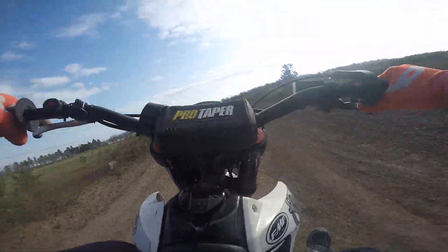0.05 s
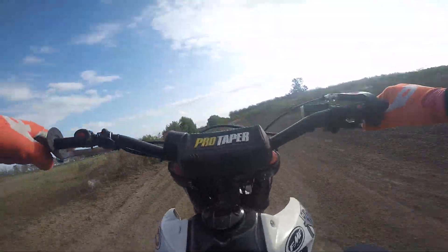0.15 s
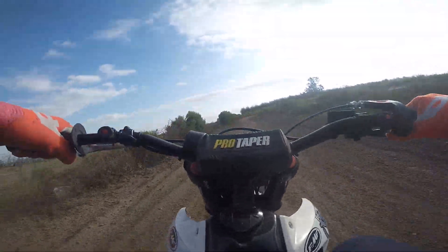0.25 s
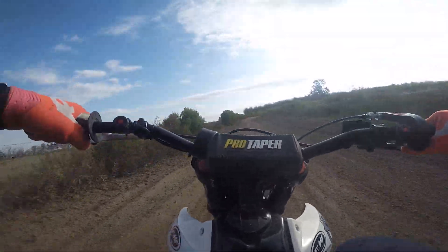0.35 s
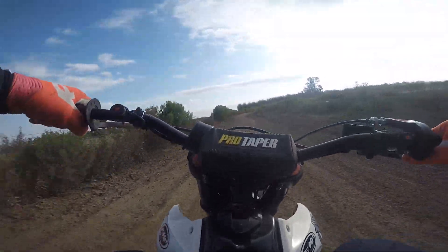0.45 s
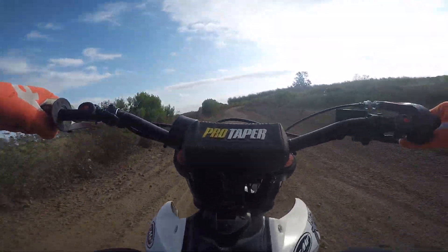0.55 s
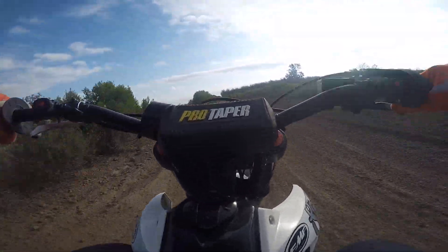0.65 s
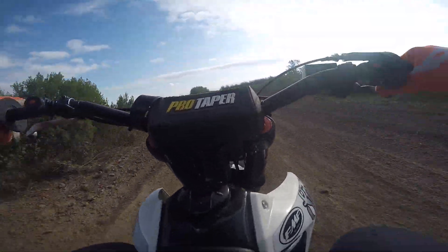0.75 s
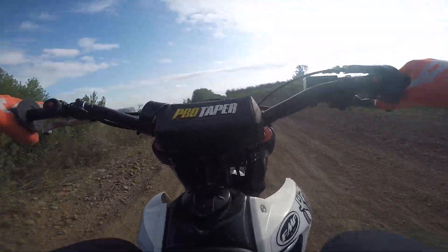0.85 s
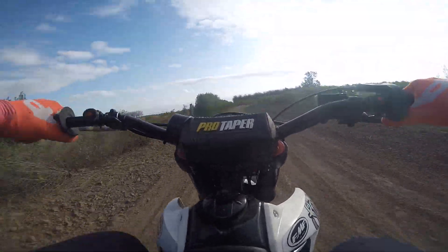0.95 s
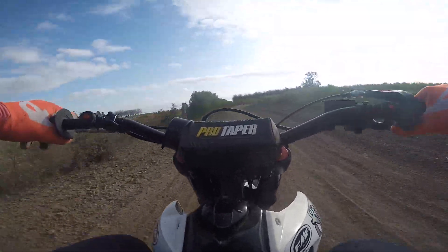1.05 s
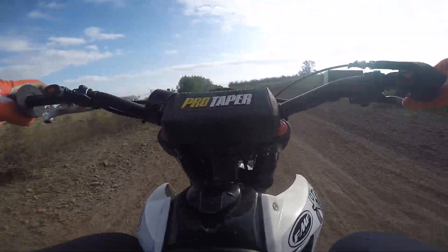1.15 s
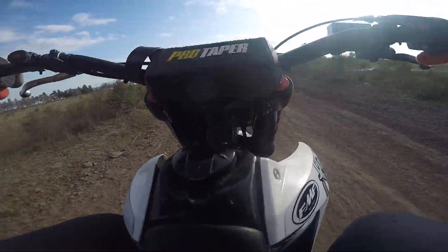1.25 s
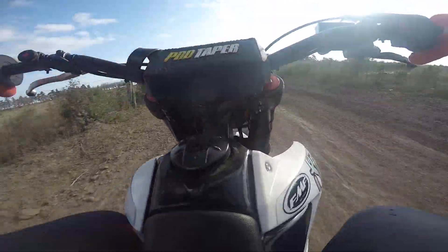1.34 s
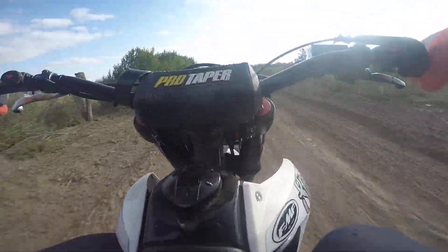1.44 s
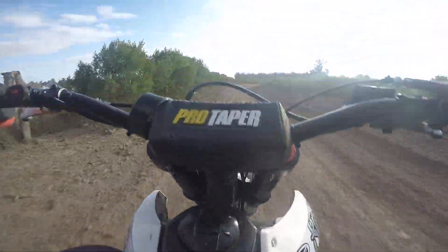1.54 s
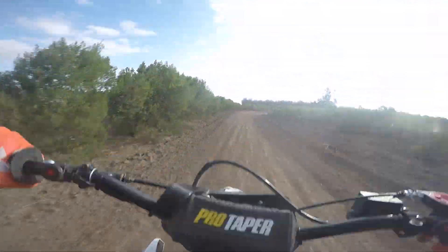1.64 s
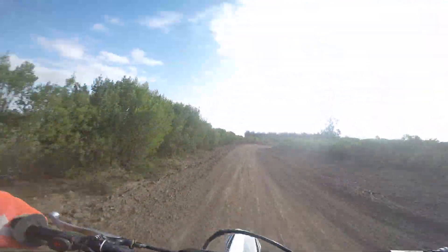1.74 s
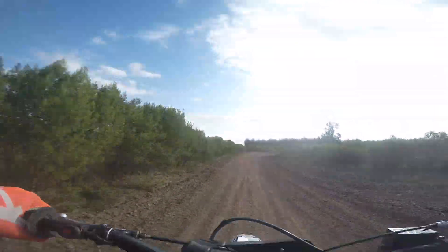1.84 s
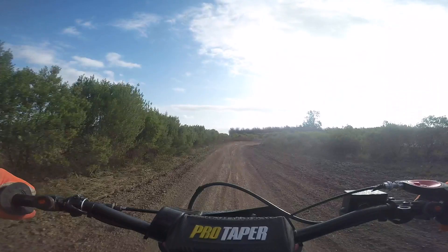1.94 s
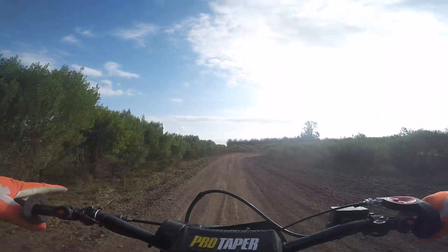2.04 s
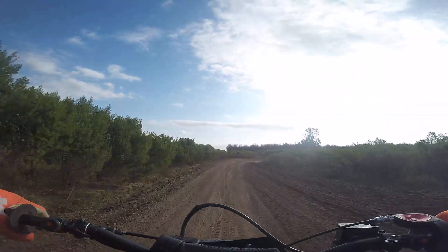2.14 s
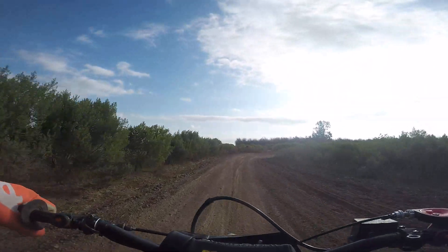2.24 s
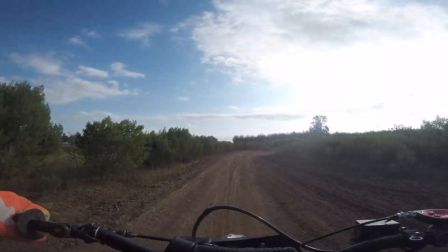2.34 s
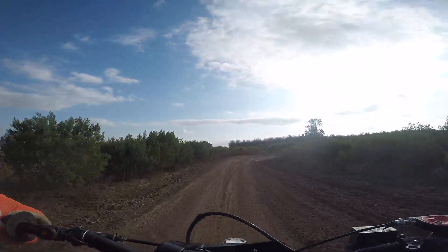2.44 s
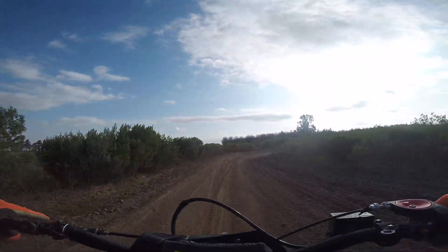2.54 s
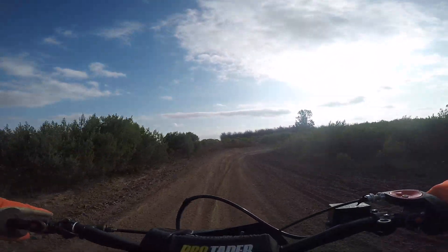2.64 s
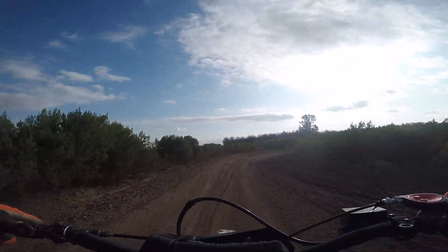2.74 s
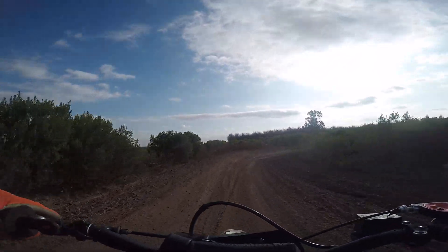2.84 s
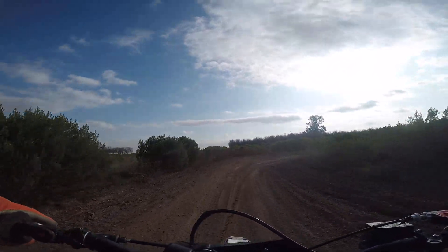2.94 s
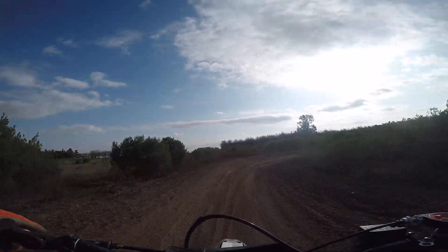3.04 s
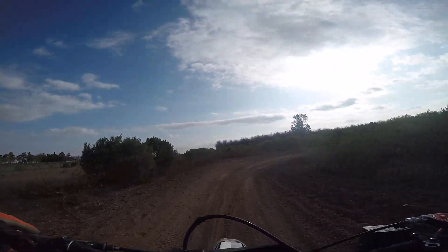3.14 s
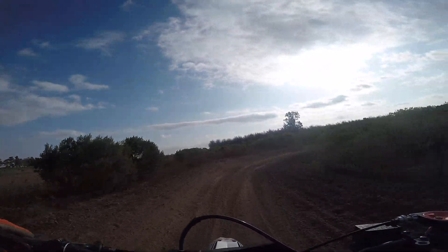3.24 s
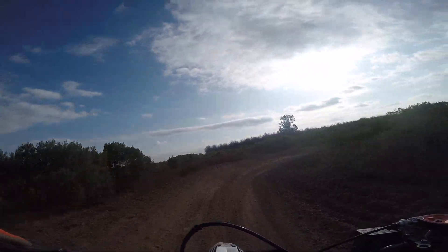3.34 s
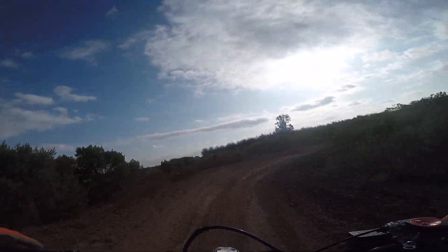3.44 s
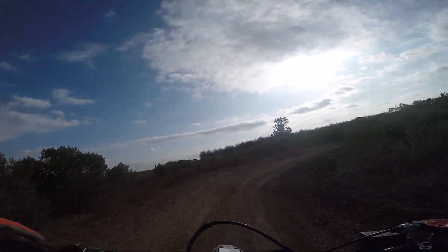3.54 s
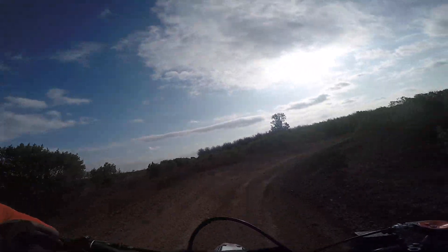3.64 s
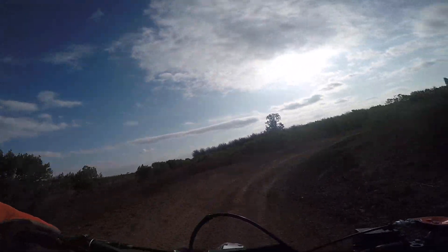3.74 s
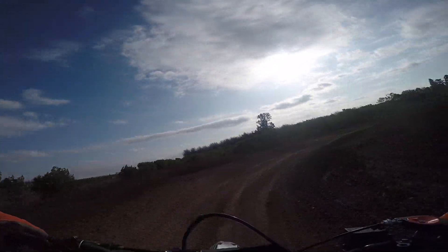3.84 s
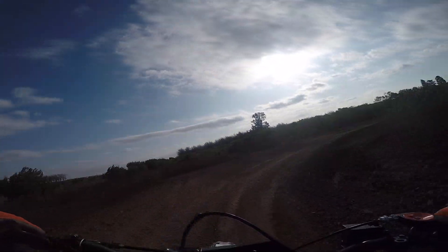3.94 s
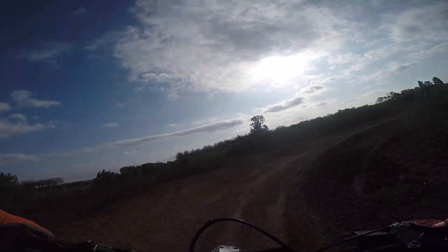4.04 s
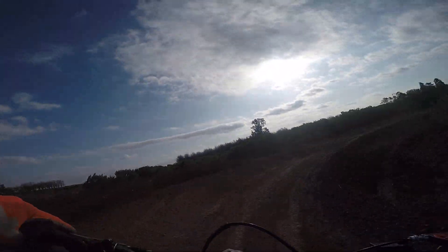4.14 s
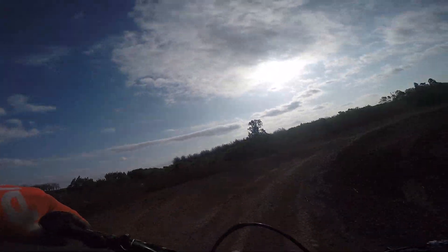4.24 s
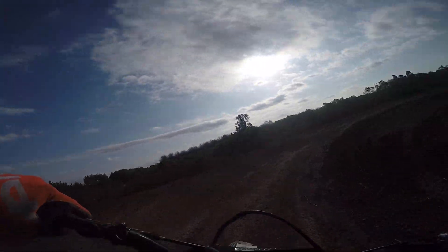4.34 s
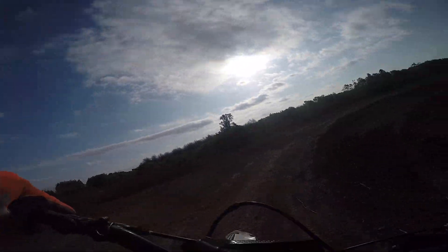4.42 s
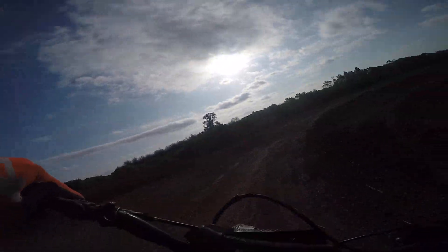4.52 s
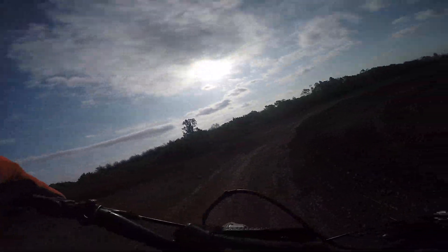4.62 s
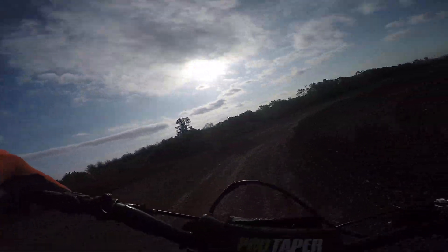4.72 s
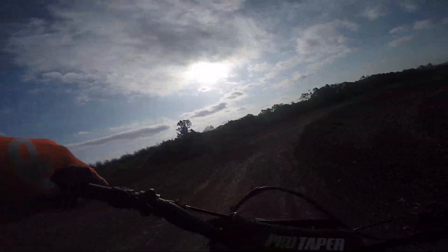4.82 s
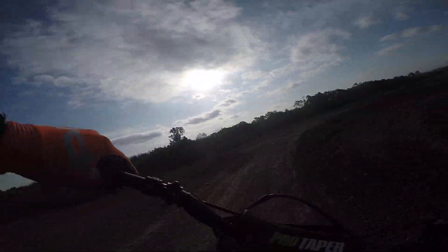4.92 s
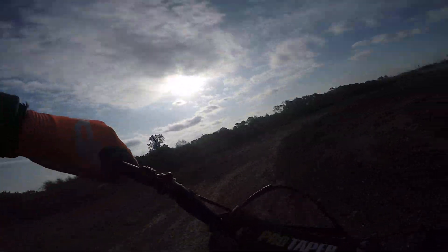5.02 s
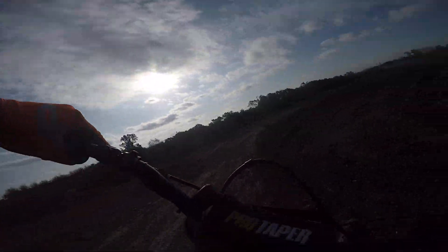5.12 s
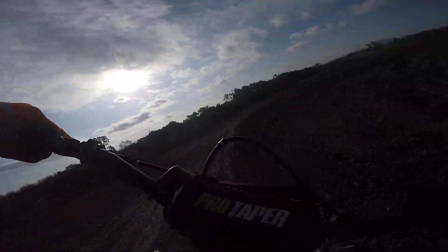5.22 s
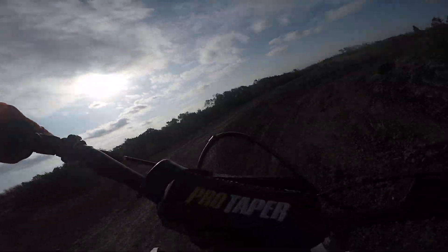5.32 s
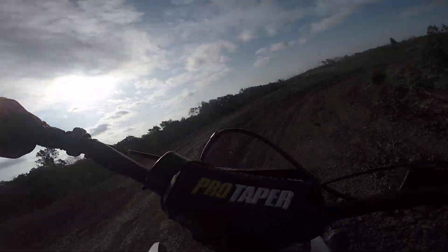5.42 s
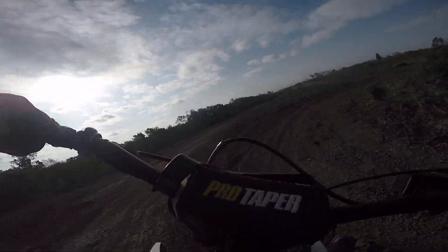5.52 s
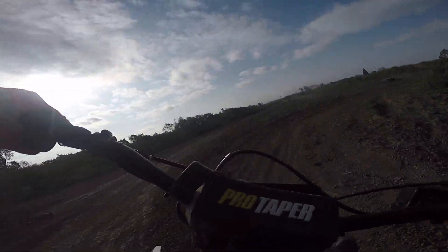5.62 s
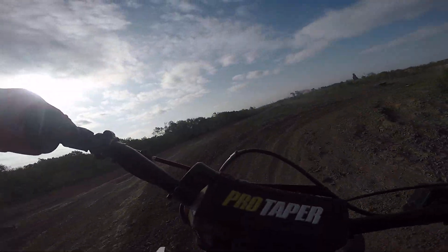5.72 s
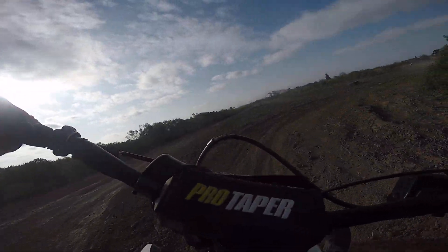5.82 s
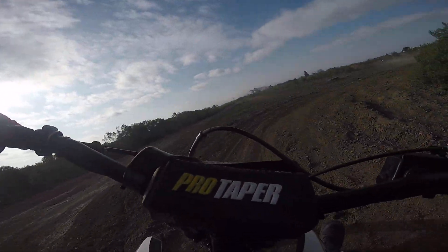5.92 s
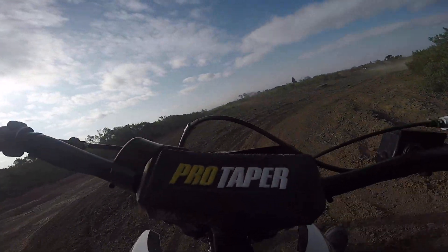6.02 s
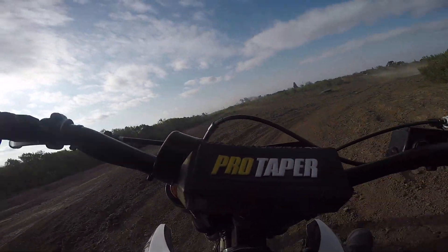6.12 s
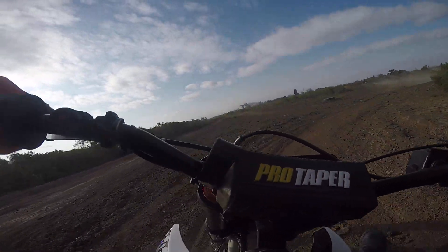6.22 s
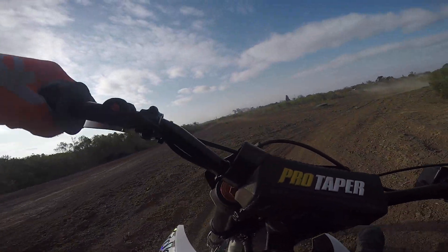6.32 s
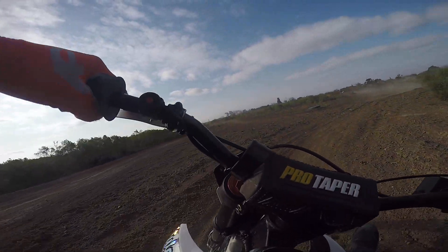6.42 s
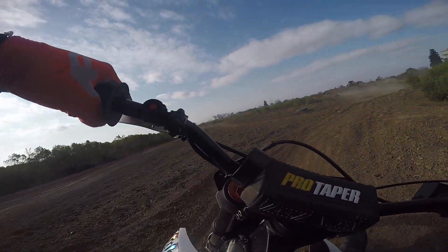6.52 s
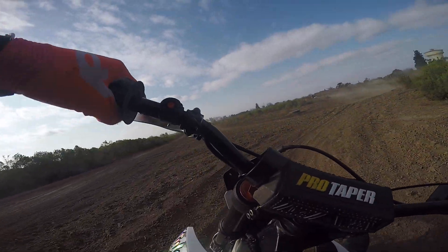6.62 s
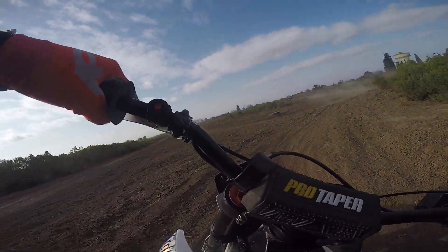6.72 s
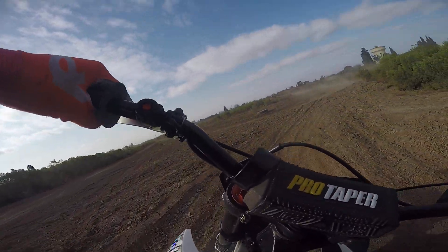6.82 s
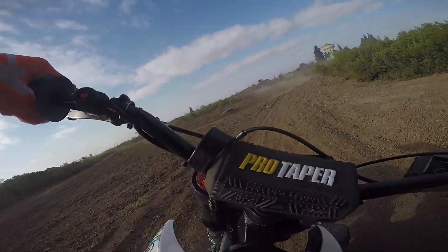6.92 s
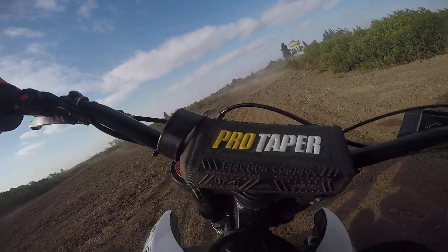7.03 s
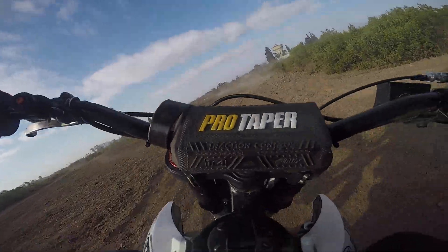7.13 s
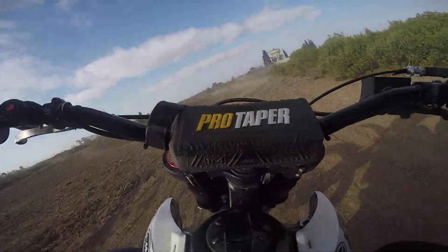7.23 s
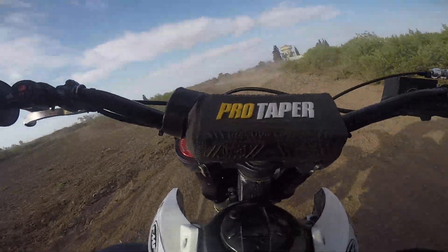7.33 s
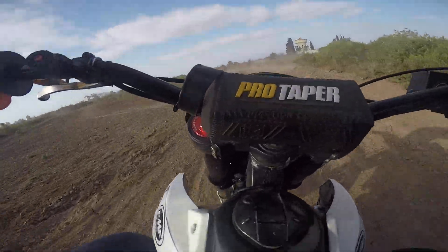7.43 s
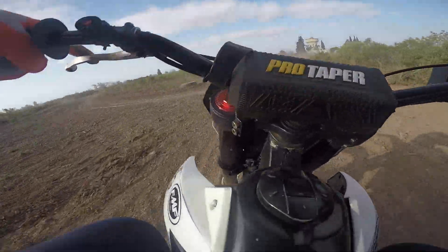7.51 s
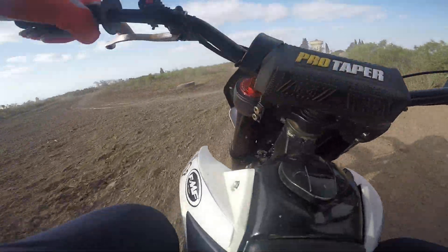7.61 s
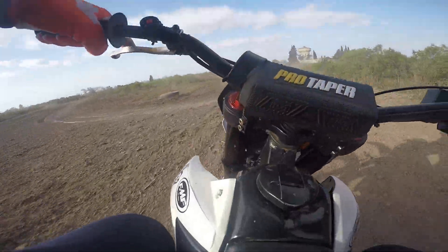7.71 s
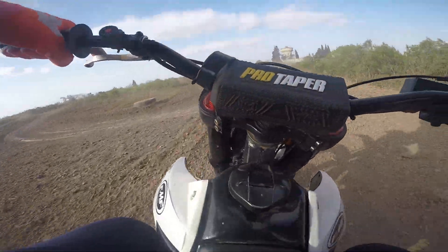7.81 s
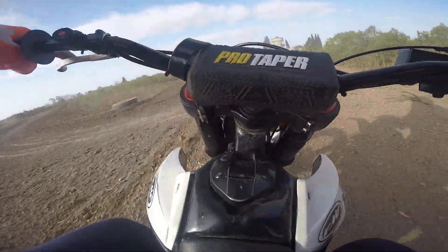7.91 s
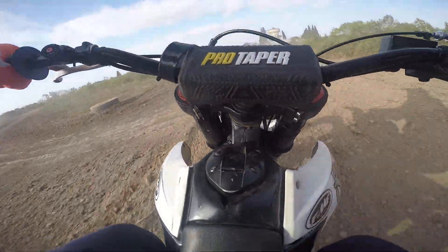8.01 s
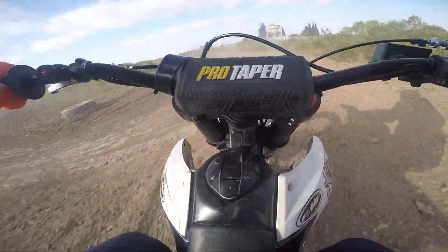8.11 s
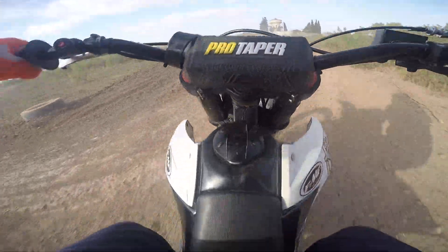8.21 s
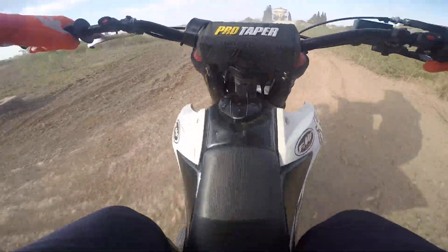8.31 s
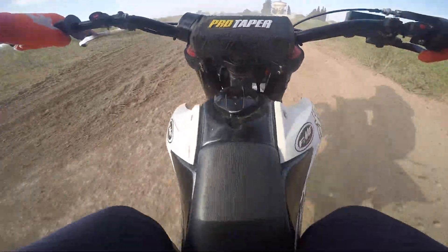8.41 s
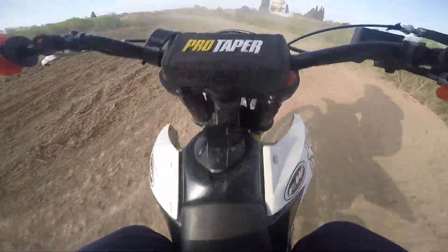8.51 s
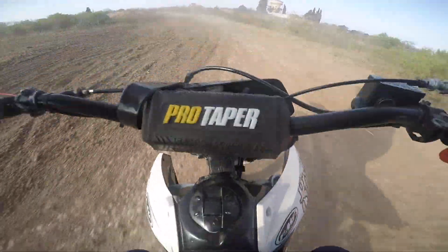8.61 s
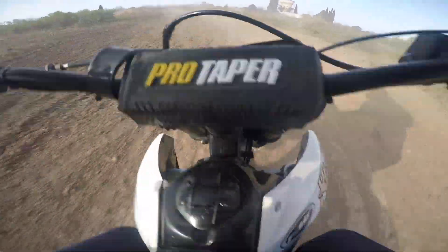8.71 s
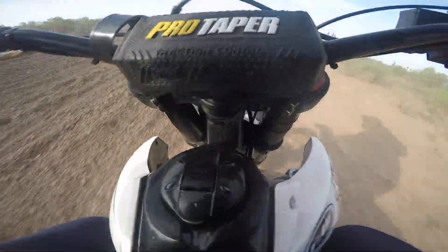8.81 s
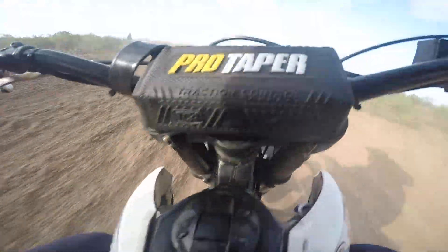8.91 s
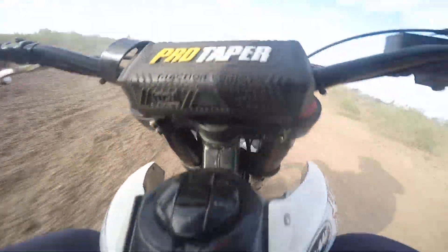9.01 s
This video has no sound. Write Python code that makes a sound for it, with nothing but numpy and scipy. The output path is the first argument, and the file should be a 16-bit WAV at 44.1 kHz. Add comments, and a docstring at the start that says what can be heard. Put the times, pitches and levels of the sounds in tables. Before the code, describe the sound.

A dirt bike engine revs hard, slows almost to a stall with chain knocks, then chugs and accelerates away in buffeting wind.

```python
"""On a dirt bike, heard from the rider's chest. The single-cylinder four-stroke engine pulls hard,
coasts into a bend, nearly stalls while the drive chain knocks, chugs round and speeds away.
Each firing booms in the exhaust pipe, the airbox blares as it sucks air, and the casings clatter.
Gears whine, a body panel hums, the brake squeaks once, and wind buffets the microphone."""
import sys
import numpy as np
from scipy import signal
from scipy.fft import rfft, irfft, next_fast_len
from scipy.io import wavfile
from scipy.ndimage import uniform_filter1d, map_coordinates

SR = 44100
rng = np.random.default_rng(int(sys.argv[2]) if len(sys.argv) > 2 else 0)


def int16_out(signal):
    """Quantize to a 16-bit WAV file."""
    q = np.round(np.clip(np.atleast_2d(signal).T, -1, 1) * 32767)
    wavfile.write(sys.argv[1], SR, q.astype(np.int16))


N = 399526

# Engine speed. Each row: time in seconds, firings per second.
ENGINE_SPEED = [(0, 76), (.15, 74.3), (.43, 81.4), (.66, 86), (.96, 83.8), (1.11, 96.6), (1.26, 77.7),
                (1.51, 67.5), (1.68, 55.8), (2.15, 55), (2.48, 47.5), (2.85, 45.3), (3.35, 38.5),
                (3.7, 29.8), (4.15, 14.6), (4.43, 16), (4.62, 26.8), (5.12, 25.7), (5.35, 30.6),
                (5.47, 28.7), (5.72, 26.8), (6, 31), (6.5, 35.8), (6.74, 41.7), (7.03, 52.6), (7.33, 52),
                (7.48, 55.8), (8.08, 67.8), (8.3, 71), (8.58, 93.4), (8.79, 71), (9.06, 81)]
# The rider's hand. Each row: time in seconds, throttle from 0 (shut) to 1 (open).
THROTTLE_TWIST = [(0, 0.63), (.2, 0.63), (.45, 0.59), (1.08, 0.55), (1.42, .48), (1.5, 0.23), (1.78, 0.01),
                  (2, .1), (3.05, 0.06), (3.22, 0.03), (4.2, 0.03), (5.05, 0.02), (5.35, 0.07), (6.05, .16),
                  (6.6, 0.17), (7.03, 0.67), (8.1, .9), (8.59, 0.92), (8.67, 0.2), (8.95, .8)]
# How ragged the firing is. Each row: time in seconds, roughness (0 is even, capped at 1).
FIRING_ROUGHNESS = [(0, 0), (1.45, 0.17), (1.7, 1.06), (4.3, 1.1), (4.75, 0.11), (7.05, .24), (8.1, 0.11),
                    (9.06, .16)]
# Spells of running. Each lists: start, end, fade-in and fade-out, all in seconds.
NEAR_STALL = (4.35, 5.22, .25, 0.17)
PULLING_AWAY = (6.55, 8.39, 0.22, 0.75)
COASTING = (2.2, 3.7, 0.58, .25)  # the rear wheel drives the engine

# The tone of each sound. Each row: frequency in Hz, relative level in dB.
FIRM_THUMP_TONE = [(20, -10.5), (45, -15.5), (70, 8), (100, 4.5), (135, -1.5), (165, -3.5), (200, -34.5),
                   (500, -69)]
SOFT_THUMP_TONE = [(20, -5), (45, -1), (80, 9.5), (110, -4.5), (135, -11), (175, -40), (400, -67)]
SHUT_BARK_TONE = [(90, -65.5), (195, -3.5), (235, 2.5), (285, 1), (325, -0.5), (360, -5), (410, -12),
                  (460, -16.5), (700, -18), (1200, -90)]
HALF_BARK_TONE = [(90, -34.5), (160, -6.5), (200, -7), (230, 0.5), (265, 6.5), (310, 2.5), (345, -6.5),
                  (385, -5.5), (420, -21), (600, -82), (1200, -35)]
FULL_BARK_TONE = [(90, -86), (150, -2.5), (185, 6.5), (210, 9.5), (260, 0.5), (305, -1.5), (355, 6.5),
                  (385, 3), (415, -8), (470, -13), (600, -103), (1200, -105)]
PULLING_BARK_TONE = [(150, -39.5), (210, -9), (255, 2), (305, 3.5), (355, 8), (400, -18), (460, -21),
                     (1000, -62)]
RASP_TONE = [(120, -20.5), (400, -0.5), (505, 7.5), (570, -4), (630, 4.5), (710, -4), (820, -1.5),
             (1000, -8.5), (1300, -20), (1900, -34), (4000, -45)]
BLARE_TONE = [(600, -52), (1050, -16.5), (1280, -6), (1500, -5.5), (1700, -1.5), (1880, 2), (2200, -5.5),
              (2650, -4), (2950, -10), (3200, -19.5), (3700, -2.5), (4400, -19), (5500, -24), (9000, -37.5)]
CLATTER_TONE = [(300, -3.5), (950, -14), (1600, -7.5), (2440, -2.5), (2600, 4), (2920, 0), (3270, -14),
                (3700, -1), (4500, -0.5), (4680, -6.5), (4880, -9), (5550, -11.5), (6200, -21.5),
                (7300, -68.5)]
FIZZ_TONE = [(3000, -51), (6500, 0.5), (7200, 5.5), (8000, 1.5), (8800, -6.5), (10000, -10.5), (11300, -8),
             (12800, -13.5), (14200, -9), (15500, -18)]
WIND_TONE = [(10, -8), (25, 1), (45, 2.5), (80, -9), (140, -18.5), (300, -27), (1000, -53)]
HONK_TONE = [(1100, -45.5), (1420, -3), (1520, -13), (1640, -14.5), (2000, -24)]
CLACK_TONE = [(150, -10), (420, -20), (900, -15), (1600, -0.5), (2600, 3.5), (3250, -4), (4000, -2.0),
              (5000, -1.0), (6200, -18), (7600, -11), (9500, -29.5), (15500, -30)]
# The notes the casings ring at. Each row: pitch in Hz, width in Hz, relative level in dB.
CASING_NOTES = [(1933, 70, -15), (2595, 110, -9.5), (2846, 91, -10), (3880, 20, -30), (4070, 37, -14.5),
                (4950, 220, -12.5)]

# Base loudness of each part. Each lists: dB at MID_REVS with the throttle shut, dB added when the revs
# double, the same two under full load, and the throttle that gives about three quarters of that load.
THUMP_LEVELS = (-29.5, 6, -22, 1, 0.48)
BARK_LEVELS = (-36, 7, -16, 5, 0.49)
RASP_LEVELS = (-47, 8, -32, 0.5, 0.16)
BLARE_LEVELS = (-36, 6.9, -20, 2, 0.42)
CLATTER_LEVELS = (-31.5, 9.5, -26, 1, 0.22)
CASING_LEVELS = (-32.5, 11.5, -31.5, .5, 0.7)
FIZZ_LEVELS = (-50.5, 8.5, -44, 5, 0.24)
# Sounds that peak at one engine speed. Each lists: that speed and the spread to either side in firings
# per second, then the gain in dB at that speed on full throttle.
AIRBOX_HONK = (56.3, 6.3, -22)
GEAR_WHINE = (57.7, 4.5, -21.5)

# Swells of wind and of panel hum. Each row: time of the peak and fade time in seconds, level in dB.
WIND_GUSTS = [(.15, 0.49, -20), (1.05, 0.26, -25), (1.6, 0.41, -25), (1.92, 0.088, -18.5), (2.4, 0.73, -26),
              (3.4, .4, -31.5), (4.56, .12, -26), (4.9, .3, -31), (6.9, 0.2996, -24), (7.17, 0.17, -21),
              (7.6, .3, -21.5), (8.3, .35, -28), (8.82, .11, -15.5)]
PANEL_SWELLS = [(1.13, 0.16, -32), (1.64, 0.11, -27), (2.15, 0.15, -52), (3.56, 0.23, -42), (4.8, .3, -56)]
# The chain snatches. Each row: time in seconds, level in dB before KNOCK_DB is added.
CHAIN_SLAPS = [(2.4635, -15.5), (4.126, -26), (4.18, -26), (4.2545, -26.5), (4.2981, -19.5), (4.3605, -21),
               (4.4283, -20.5), (4.499, -16.5), (4.555, -24.5)]
# The brake's chirp lists: start in seconds, length in seconds, pitch in Hz.
BRAKE_CHIRP = (2.491, .035, 3835)

MID_REVS, THUMP_FADE_REVS, SIZZLE_REVS = 50, 72, 92  # firings per second
THUMP_FADE_DB = 0.6  # lost for each firing per second above THUMP_FADE_REVS
SIZZLE_DB = 4  # extra fizz at SIZZLE_REVS
STALL_THUMP_DB, STALL_BARK_DB, COAST_THUMP_DB = 7.5, -4, 4  # how the spells shift the pipe's balance
WIND_DB, SURGE_DB = -31.5, 0.99
SINGING_HZ, SINGING_DB = 6990, -45
KNOCK_RISE_S, KNOCK_DECAY_S, KNOCK_DB = 0.0029, .009, -8
TOP_HZ = 15300


def amp(db):
    """Turns decibels into a gain to multiply by."""
    return 10 ** (np.asarray(db) / 20)


def unit(x):
    """Scales x to an average (rms) level of 1."""
    return x / np.sqrt(np.mean(x ** 2) + 1e-20)


def steady(x):
    """Holds the level of x near 1 from moment to moment."""
    size = SR // 12
    power = uniform_filter1d(uniform_filter1d(x * x, size), size)
    return x / np.sqrt(np.abs(power) + 1e-14)


def curve(rows):
    """Joins (time, value) rows with straight lines."""
    times, values = np.transpose(rows)
    return np.interp(np.arange(N) / SR, times, values)


def wobble(rate):
    """A smooth curve through `rate` random values a second."""
    return map_coordinates(rng.standard_normal(4096), [np.arange(N) * rate / SR + 2], mode="wrap")


def noise():
    """Fresh white noise."""
    return rng.standard_normal(N)


def colour(x, tone, size=8192):
    """Filters x so that it takes on a tone from the tables."""
    hz, db = np.transpose(tone)
    gain = amp(np.interp(np.log(np.fft.rfftfreq(size, 1 / SR) + 1), np.log(hz), db, right=-110))
    # this folding makes the filter ring after a hit, never before it
    cepstrum = irfft(np.log(gain))
    cepstrum[1:size // 2] *= 2
    cepstrum[size // 2 + 1:] = 0
    ringing = irfft(np.exp(rfft(cepstrum)))[:size // 2]
    return signal.fftconvolve(x, ringing)[:N]


def scatter(x, t60, count=4):
    """Smears x with echoes that fall 60 dB in t60 seconds and shift as the rider moves."""
    t = np.arange(SR // 8) / SR
    tails = rng.standard_normal((count, len(t))) * amp(-60 * t / t60)
    shares = np.array([wobble(3.5) for _ in tails])
    echoes = signal.oaconvolve(x[None], tails, axes=1)[:, :N]
    return np.sum(echoes * shares, 0) / np.linalg.norm(shares, axis=0)


def pulses(cycle, rough, size_db, jitter_s):
    """One pulse per engine cycle; rough running makes their size and timing uneven."""
    at = np.interp(np.arange(1, int(cycle[-1])), cycle, np.arange(N))
    size_luck, time_luck = rng.standard_normal((1024, 2))[:len(at)].T * rough[at.astype(int)]
    at = at + jitter_s * SR * time_luck
    taps = at.astype(int)[:, None] + np.arange(-7, 9)  # lets a pulse land between samples
    offset = taps - at[:, None]
    shape = np.sinc(offset) * np.sinc(offset / 8) * amp(size_db * size_luck)[:, None]
    return np.bincount(np.clip(taps, 0, N - 1).ravel(), shape.ravel(), N)


def throb(cycle, depth_db, lag):
    """A gain that swells once per cycle."""
    return unit(amp(depth_db * np.cos(2 * np.pi * (cycle - lag))))


def ring(hz, width_hz):
    """A note kept ringing by random shaking."""
    turn = 2 * np.pi * hz * np.arange(N) / SR
    return unit(wobble(width_hz) * np.cos(turn) + wobble(width_hz) * np.sin(turn))


def late(x, delay_s):
    """x a moment later."""
    return np.interp(np.arange(N) - delay_s * SR, np.arange(N), x)


def spell(start, end, fade_in, fade_out):
    """Fades from 0 to 1, holds, and fades back."""
    t = np.arange(N) / SR
    return np.clip(np.minimum((t - start) / fade_in, (end - t) / fade_out), 0, 1)


def swells(rows):
    """A gain with one bell-shaped swell per row."""
    t = np.arange(N) / SR
    return sum(amp(db) * np.exp(-2 * ((t - peak) / fade) ** 2) for peak, fade, db in rows)


def loudness(levels, throttle, revs):
    """A part's gain: it follows revs and throttle, and levels off under load."""
    shut_db, shut_slope, open_db, open_slope, knee = levels
    octaves, load = np.log2(revs / MID_REVS), np.tanh(throttle / knee)
    return amp((1 - load) * (shut_db + shut_slope * octaves) + load * (open_db + open_slope * octaves))


def surge():
    """A gain that wanders a little."""
    return amp(SURGE_DB * wobble(9))


def tuned(resonance, throttle, revs):
    """The gain of a part that sounds under load around one engine speed."""
    centre, width, db = resonance
    return amp(db) * throttle / (1 + ((revs - centre) / width) ** 2)


def pipe_thump(beats, gas, revs):
    """The low thump leaves the tailpipe last; it turns soft and heavy when coasting or near a stall."""
    stalling, coasting = spell(*NEAR_STALL), spell(*COASTING)
    softness = np.maximum(stalling, .5 * coasting)
    firm, soft = (steady(colour(beats + 0.81 * gas, tone)) for tone in (FIRM_THUMP_TONE, SOFT_THUMP_TONE))
    thump = late(steady((1 - softness) * firm + softness * soft), delay_s=0.0028)
    fade_db = THUMP_FADE_DB * np.maximum(revs - THUMP_FADE_REVS, 0)
    return thump * amp(STALL_THUMP_DB * stalling + COAST_THUMP_DB * coasting - fade_db)


def pipe_bark(blows, beats, gas, shut, full):
    """The throttle blends three voices of the pipe; pulling away from low revs, it barks higher."""
    voices = [(shut, beats, SHUT_BARK_TONE), (1 - shut - full, blows, HALF_BARK_TONE),
              (full, blows, FULL_BARK_TONE)]
    bark = steady(sum(share * steady(colour(drive + .5 * gas, tone)) for share, drive, tone in voices))
    high_bark = steady(colour(blows + .5 * gas, PULLING_BARK_TONE))
    pulling = spell(*PULLING_AWAY)
    return amp(STALL_BARK_DB * spell(*NEAR_STALL)) * steady((1 - pulling) * bark + pulling * high_bark)


def silencer_rasp(beats, gas, throttle, shut):
    """Single putts when little gas flows; at high flow the silencer smears them into a rasp."""
    smeared = (1.25 - .7 * shut) * unit(scatter(beats, t60=.03))
    bright = colour(.8 * shut * beats + smeared + (1.4 + 2 * throttle) * gas, RASP_TONE)
    dull = signal.sosfilt(signal.butter(4, 690, fs=SR, output="sos"), bright)
    return steady(np.sqrt(shut) * dull + np.sqrt(1 - shut) * bright)


def exhaust(cycle, throttle, revs, rough):
    """Each firing sends a blow and a puff of gas down the pipe: even under load, ragged when coasting."""
    blows = unit(pulses(cycle, rough, size_db=2.0, jitter_s=0.00025))
    # at small throttle an echo along the pipe follows each blow
    beats = blows + 0.61 * (1 - throttle) ** 2 * late(blows, delay_s=0.006775)
    gas = rough * unit(throb(cycle, depth_db=7, lag=.15) * noise())
    shut = np.clip(1 - 2 * throttle, 0, 1)
    full = np.clip(2 * throttle - 1, 0, 1)
    return (loudness(THUMP_LEVELS, throttle, revs) * pipe_thump(beats, gas, revs)
            + loudness(BARK_LEVELS, throttle, revs) * pipe_bark(blows, beats, gas, shut, full)
            + loudness(RASP_LEVELS, throttle, revs) * silencer_rasp(beats, gas, throttle, shut))


def intake(cycle, throttle, revs, rough):
    """The airbox blares and honks: under load it buzzes with the firings, over gusts of sucked air."""
    gulps = pulses(cycle, rough, size_db=10, jitter_s=.00014)
    buzz = 2.4 * np.sqrt(throttle) * steady(colour(scatter(gulps, t60=0.12), BLARE_TONE))
    air = unit(colour(throb(cycle, depth_db=1.0, lag=0.24) * noise(), BLARE_TONE))
    honk = steady(colour(unit(gulps) + 0.22 * air, HONK_TONE))
    blare = loudness(BLARE_LEVELS, throttle, revs) * surge() * steady(buzz + air)
    return blare + tuned(AIRBOX_HONK, throttle, revs) * honk


def machinery(cycle, throttle, revs):
    """Valves, chain and gears rattle the casings and keep them ringing; a fizz flares at high revs."""
    rattle = throb(2 * cycle, depth_db=1.0, lag=0.78) * amp(0.9 * wobble(330) + 0.73 * wobble(35))
    ticks = pulses(cycle, np.ones(N), size_db=2.0, jitter_s=.00002)
    valves = steady(scatter(ticks, t60=0.11))
    clatter = unit(colour(rattle * (noise() + throttle * valves), CLATTER_TONE))
    notes = sum(amp(db + 0.6 * wobble(6)) * ring(hz, width) for hz, width, db in CASING_NOTES)
    hiss = throb(cycle, depth_db=1.5, lag=0.39) * amp(1.8 * wobble(400)) * noise()
    fizz = amp(SIZZLE_DB * (revs / SIZZLE_REVS) ** 8) * unit(colour(hiss, FIZZ_TONE))
    parts = [(CLATTER_LEVELS, clatter), (CASING_LEVELS, rattle * unit(notes)), (FIZZ_LEVELS, fizz)]
    return surge() * sum(loudness(levels, throttle, revs) * part for levels, part in parts)


def wind():
    """Moving air and bumps buffet the microphone in lumps."""
    rumble = steady(colour(amp(2.7 * wobble(22)) * noise(), WIND_TONE))
    return np.hypot(amp(WIND_DB), swells(WIND_GUSTS)) * rumble


def singing_metal(revs):
    """A thin metal part sings at high revs."""
    shaking = np.clip(revs / 85, 0, 1) ** 5
    return amp(SINGING_DB) * shaking * ring(SINGING_HZ, width_hz=61)


def gears(cycle, throttle, revs):
    """The drive gears whine under load as their teeth meet, 45 times per engine cycle."""
    turn = 2 * np.pi * 45 * cycle + 1.2 * wobble(150)
    return tuned(GEAR_WHINE, throttle, revs) * amp(3.4 * wobble(14)) * np.sin(turn)


def panel_hum():
    """A body panel hums now and then."""
    return swells(PANEL_SWELLS) * steady(ring(hz=463, width_hz=15))


def chain_knocks():
    """The chain slaps its guides: a short scraping run-up, then a clack that dies fast."""
    t, force = np.arange(N) / SR, np.zeros(N)
    for hit, db in CHAIN_SLAPS:
        before, after = (hit - t) / KNOCK_RISE_S, (t - hit - .003) / KNOCK_DECAY_S
        force += amp(db + KNOCK_DB) * np.exp(-np.maximum(before, after))
    return force * unit(colour(noise(), CLACK_TONE))


def brake_squeak():
    """The brake pad chirps once: a wavering note with a faint octave above it."""
    start, length, hz = BRAKE_CHIRP
    t = np.arange(N) / SR
    progress = np.clip((t - start) / length, 0, 1)
    swell = np.sqrt(np.abs(np.sin(np.pi * progress)))
    turn = 2 * np.pi * hz * t + .6 * wobble(400)
    return amp(-19) * swell * (np.sin(turn) + amp(-30) * np.sin(2 * turn))


def scene():
    """Revs and throttle drive the engine's sounds; wind, panel, chain and brake keep their own times."""
    revs = curve(ENGINE_SPEED)
    throttle, rough = np.clip([curve(THROTTLE_TWIST), curve(FIRING_ROUGHNESS)], 0, 1)
    cycle = np.cumsum(revs) / SR + .25  # counts up by one per firing
    mix = exhaust(cycle, throttle, revs, rough) + intake(cycle, throttle, revs, rough)
    mix += machinery(cycle, throttle, revs) + wind() + singing_metal(revs) + gears(cycle, throttle, revs)
    return (mix + panel_hum() + chain_knocks() + brake_squeak())[None]


def record(dry):
    """Cuts away all the treble above TOP_HZ."""
    size = next_fast_len(N + SR // 4)
    kept = np.fft.rfftfreq(size, 1 / SR) < TOP_HZ
    return irfft(rfft(dry, size) * kept, size)[..., :N]


dry = scene()
out = record(dry)
int16_out(out)
```